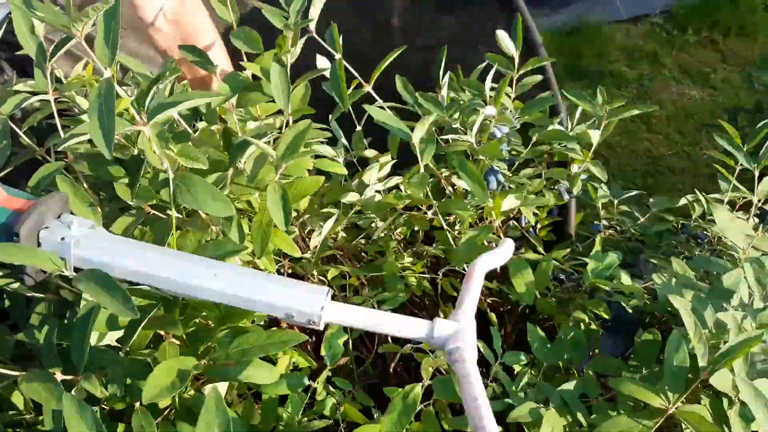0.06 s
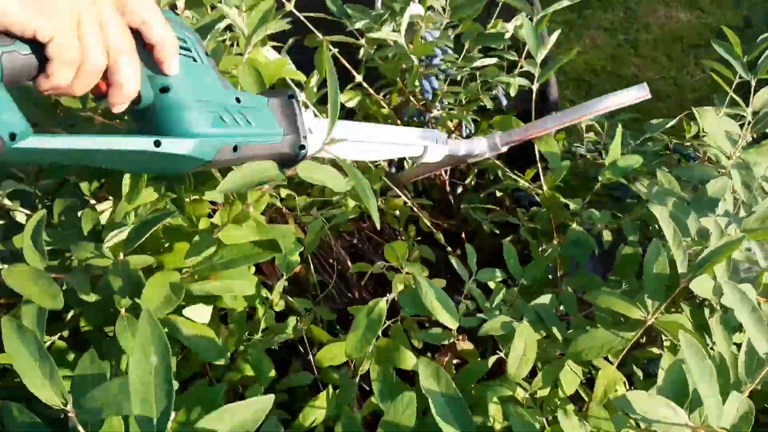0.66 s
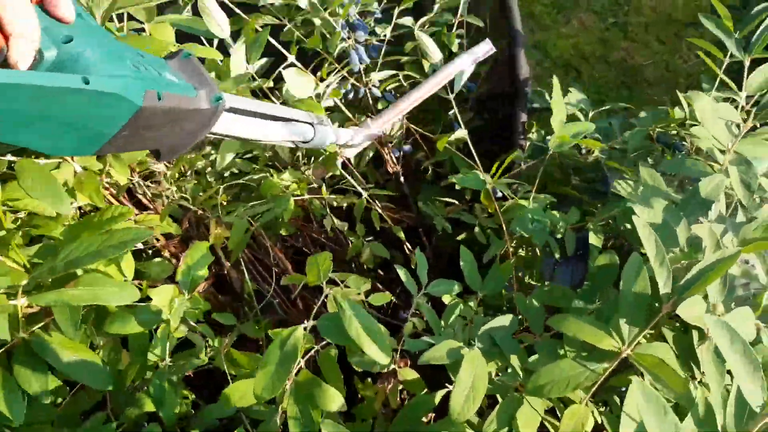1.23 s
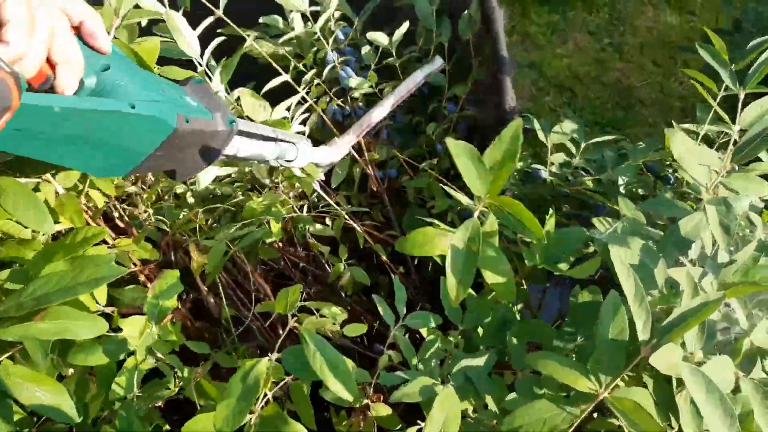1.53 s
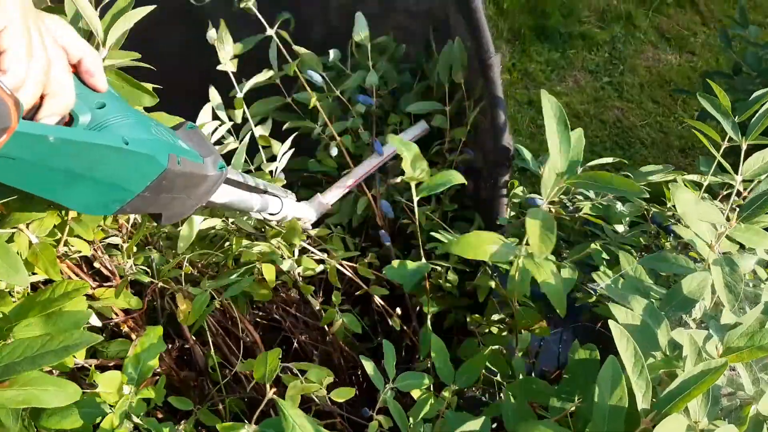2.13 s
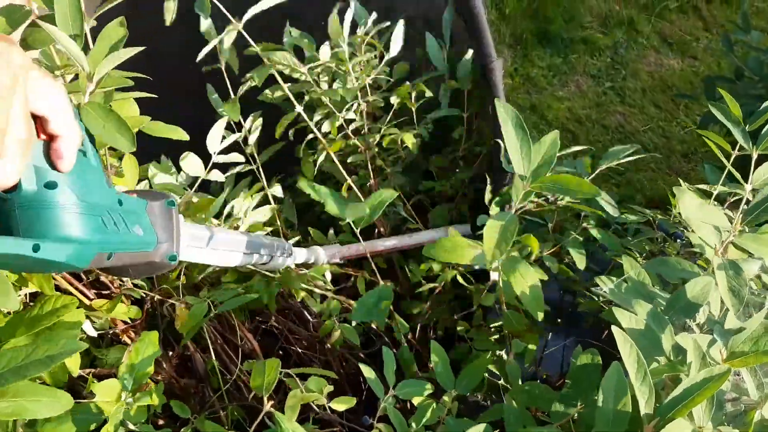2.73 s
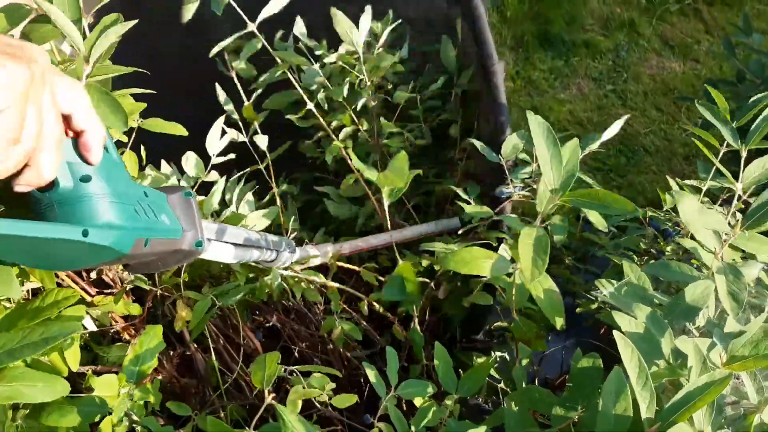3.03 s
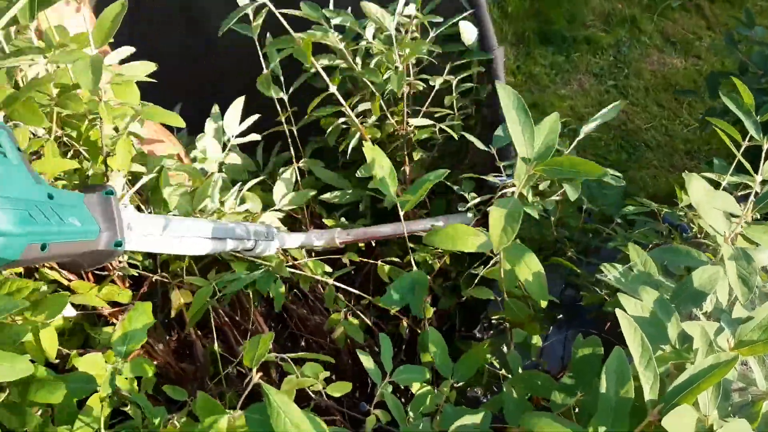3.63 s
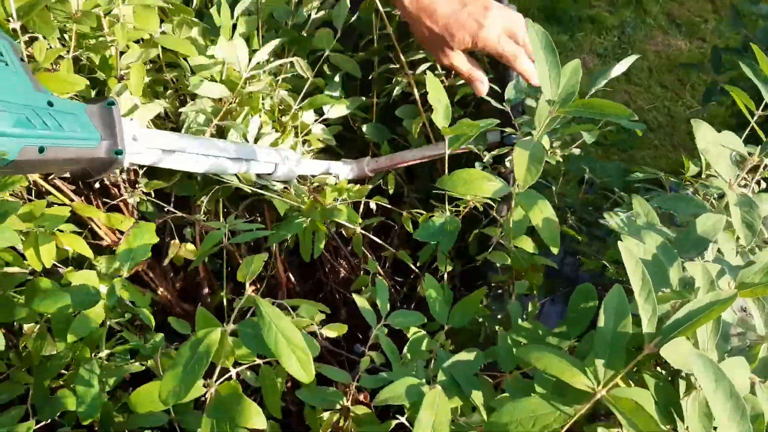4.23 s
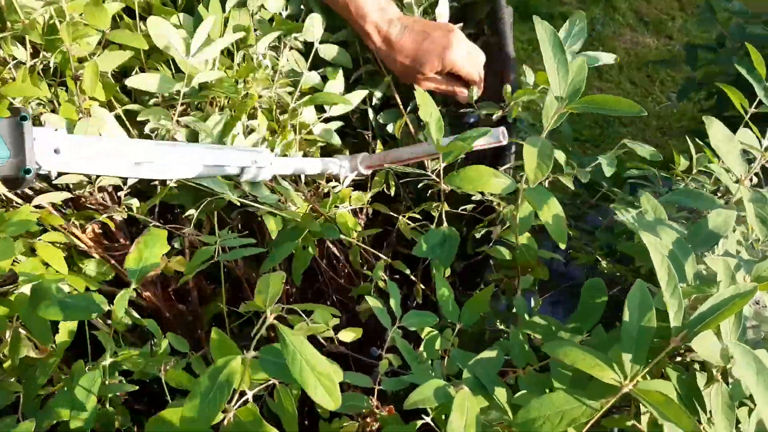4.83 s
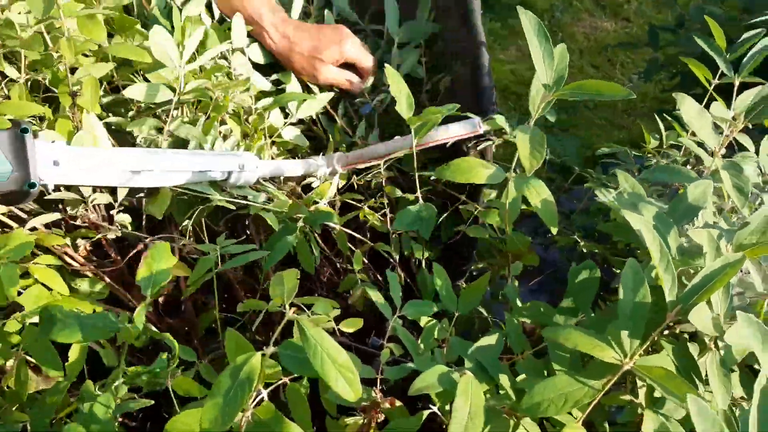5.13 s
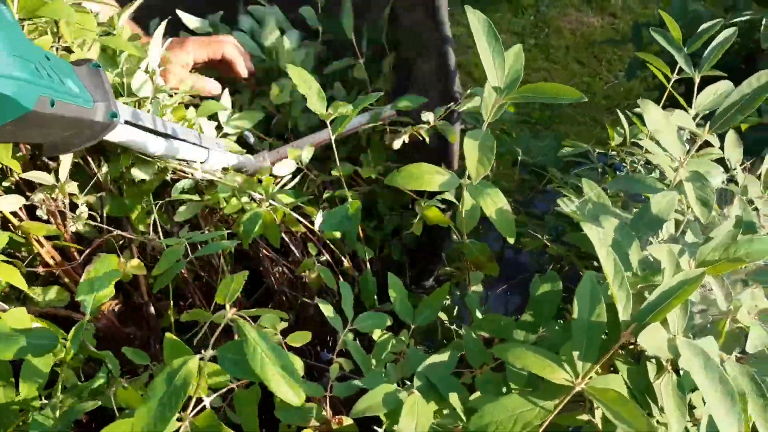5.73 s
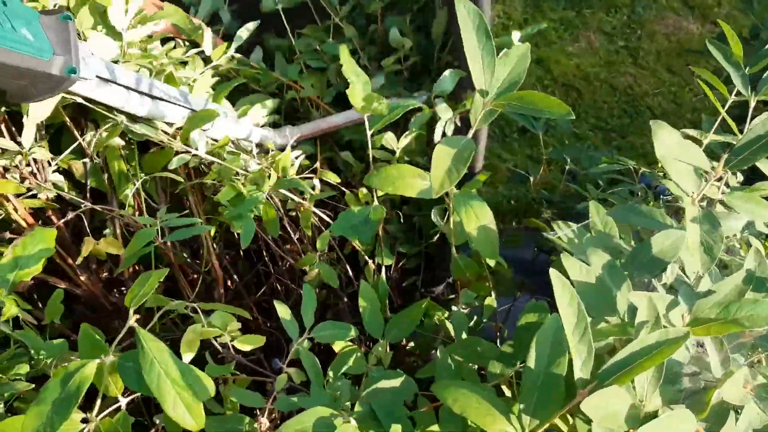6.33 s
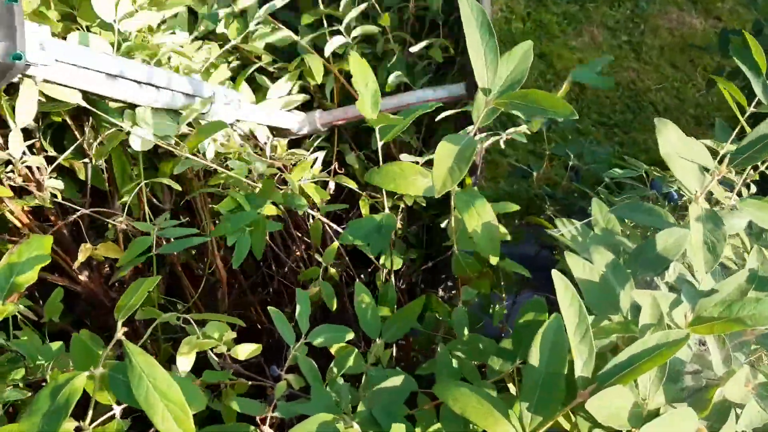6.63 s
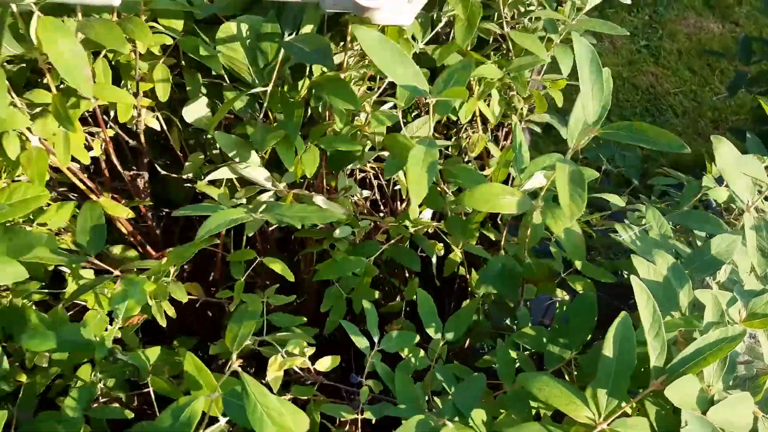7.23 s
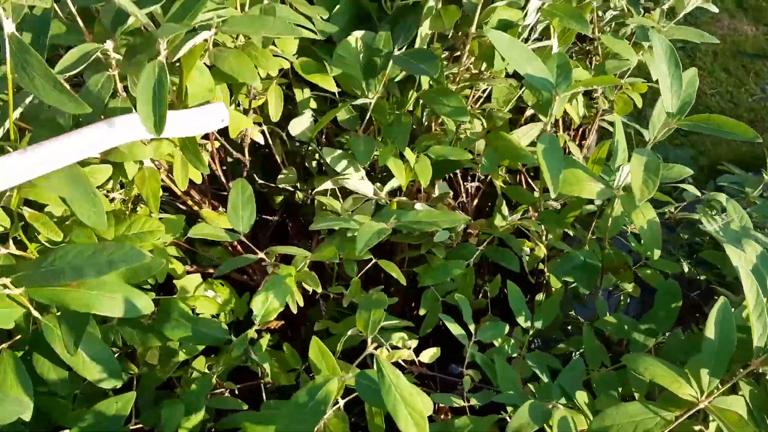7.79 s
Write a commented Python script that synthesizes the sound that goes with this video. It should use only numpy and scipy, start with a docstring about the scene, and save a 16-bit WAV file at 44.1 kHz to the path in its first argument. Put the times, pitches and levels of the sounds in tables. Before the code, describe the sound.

Close to the microphone in a quiet garden, a cordless saw shakes a bush with a rod in two loud bursts of fast mechanical rattling, each spinning up quickly and winding down. The first has a sharp knock partway through; the second is shorter. Before, between and after them, leaves rustle gently, stems bump and twigs tick. A light breeze touches the microphone, with a faint engine and a few chirps far away.

```python
"""A reciprocating saw shaking a berry bush

A cordless saw with a bent rod for a blade runs in two bursts, close to the microphone. Its slide
knocks at both ends of every stroke, rebounds and chatters, exciting the modes of the housing; gears
whine and leaves thrash. Around the bursts leaves rustle, stems bump and twigs tick, while light wind
touches the microphone and, far off, an engine hums and faint chirps sound."""
import sys
import numpy as np
from scipy import signal
from scipy.fft import rfft, irfft
from scipy.io import wavfile
from scipy.ndimage import uniform_filter1d

SR = 44100
rng = np.random.default_rng(int(sys.argv[2]) if len(sys.argv) > 2 else 0)


def dump_mix(stems):
    """Bounce the given channels to the path in sys.argv[1] as a 16-bit WAV at rate SR."""
    frames = np.atleast_2d(stems).T  # one column per channel
    limited = np.clip(frames, -1, 1)  # hard clip at full scale
    pcm = np.round(limited * 32767).astype(np.int16)
    wavfile.write(sys.argv[1], SR, pcm)


N = 346560
T = np.arange(N) / SR

# Crank speed in the two bursts. Each row: time in seconds, strokes per second.
FIRST_SPEED = [(1.884, 22), (1.92, 43.6), (2.02, 42.2), (2.47, 42.2), (2.55, 41.3), (2.78, 42.25),
               (3.3, 42.3), (3.385, 33), (3.46, 20)]
SECOND_SPEED = [(5.597, 13), (5.7, 31.3), (5.745, 39), (5.773, 41), (5.88, 42.05), (6.53, 42.08),
                (6.63, 34), (6.69, 18)]
# A slower crank strikes more softly. Each row: strokes per second, relative force in dB.
FORCE_AT_SPEED = [(15, -45), (22, -32), (26, -20), (30, -15), (34, -5), (42, 0)]
def saw():
    """Forced vibration: one crank times the knocks, the gear whine and the beating of the leaves."""
    speeds = [FIRST_SPEED, SECOND_SPEED]
    bursts = [crank(speed) for speed in speeds]
    turns, running = np.sum(bursts, axis=0)
    stroke_rate = sum(curve(speed) * on for speed, (_, on) in zip(speeds, bursts))
    force_db = np.interp(stroke_rate, *np.transpose(FORCE_AT_SPEED))
    level_db, bright_db, thrash_db, hollow_db = branch_load(force_db)
    slack = 1 + np.clip(0.37 * (-18.5 - level_db), 0, 1.5)  # lightly loaded, the blows lose their timing
    blows = [slide(*burst, slack, chatter_db=-5, chatter_per_s=650) for burst in bursts]
    drive = knocks(np.vstack(blows))
    duty = np.sqrt(np.mean(running))  # refers the rms to the running time
    body = housing(drive) * duty + gear_whine(turns) * running
    treble = butterworth(body, 1, [3000, 6200], "band")
    hollow = butterworth(body, 1, [380, 540], "band")  # the rod bent against a branch
    body = body + (undb(bright_db) - 1) * treble + (undb(hollow_db) - 1) * hollow
    tool = body * undb(level_db) + free_rod(drive) * duty * undb(force_db)
    return radiate(tool) + thrashing(turns) * running * undb(thrash_db)

def crank(speed):
    """Rotation is the integral of speed: returns the turns made and when the motor runs."""
    running = (T >= speed[0][0]) & (T <= speed[-1][0])
    return np.cumsum(curve(speed) * running) / SR * running, running

# Holds on a branch, drifting as it gives. Each row: start in seconds, knock gain in dB, its drift in
# dB/s, treble gain in dB, its drift in dB/s, leaf gain in dB, its drift in dB/s, hollow gain in dB.
BRANCH_HOLDS = [(1.884, -15, -3, -2.5, 4.5, -22, -6, 1.5), (2.778, -15.5, 2.5, -1.5, -1, -27, 2, -1),
                (5.607, -16, -.5, 5, -5.5, -22, -1.5, 3)]
def branch_load(force_db):
    """Mechanical loading: force and branch set the dB gains of knocks, treble, leaves and hollow band."""
    holds = np.array(BRANCH_HOLDS)
    held = np.maximum(np.searchsorted(holds[:, 0], T) - 1, 0)
    start, knock, knock_drift, bright, bright_drift, leaves, leaves_drift, hollow = holds[held].T
    held_s = np.clip(T - start, 0, 1)
    slip_s = np.maximum(T - 2.508, 0) * (held == 0)  # the first branch slides off the rod
    knock_db = knock + knock_drift * held_s + force_db - 32.5 * slip_s
    leaves_db = leaves + leaves_drift * held_s + force_db - 20 * slip_s
    return knock_db, bright + bright_drift * held_s, leaves_db, hollow

# Blows within one crank turn. Each row: fraction of the turn, relative crack in dB, relative dull push
# in dB, timing scatter in milliseconds before slack widens it.
TURN_BLOWS = [(0, -1.5, -2, .1), (.035, -2, -2, .15), (.075, -3.5, -3.5, .25), (.125, -5, -3, .2),
              (.28, -12, -11, .5), (.48, -.5, -6, .15), (.515, -4.5, -8, .25), (.58, -10, -10, .45),
              (.67, -12, -12, .5)]
def slide(turns, running, slack, chatter_db, chatter_per_s, scatter_db=.9):
    """Backlash: the slide strikes at each reversal, rebounds and chatters. Rows: seconds, crack, push."""
    whole_turns, run_times, rows = np.arange(int(np.max(turns)) + 1), T[running], []
    for share, crack_db, push_db, scatter_ms in TURN_BLOWS:
        late, uneven = rng.standard_normal((len(whole_turns), 2)).T
        when = np.interp(whole_turns + share, turns[running], run_times)
        loose = np.interp(when, T, slack)
        size = undb(scatter_db * uneven * loose) * (whole_turns + share < np.max(turns))
        when = when + late * loose * scatter_ms / 1000
        rows.append(np.c_[when, size * undb(crack_db), size * undb(push_db)])
    run_s = np.ptp(run_times)
    when, size = rng.random((int(chatter_per_s * run_s), 2)).T
    rows.append(np.c_[run_times[0] + when * run_s, undb(chatter_db) * (2 * size - 1), 0 * size])
    return np.vstack(rows)

def knocks(blows, points=8):
    """Impact excitation: each blow gives the same dull push and a crack from one of a few contacts."""
    times, crack, push = blows.T
    point = rng.integers(0, points, len(times))
    cracks = 0
    for k in range(points):
        hits = clicks(times[point == k], crack[point == k])
        response = contact(crack_t60=0.006, tail_t60=0.17, tail_db=-12.5)
        cracks = cracks + signal.oaconvolve(hits[None], response, axes=1)[:, :N]
    push_spectrum = [(150, -6.5), (300, -0.5), (600, -1.5), (1300, -1.5), (3000, -11.5), (8000, -23)]
    crack_spectrum = [(150, -11), (500, -6), (1100, -2), (5000, 0.5), (9000, -3), (14000, -4)]
    return colour(unit(clicks(times, push)), push_spectrum) + colour(unit(cracks), crack_spectrum)

def contact(crack_t60, tail_t60, tail_db):
    """Impulse response of one contact: a short dense crack and a tail scattered by the bush."""
    t = T[:SR // 6]
    envelope = fade(t, crack_t60) + undb(tail_db) * fade(t, tail_t60)
    return unit(stereo_noise(split_hz=2500, envelope=envelope))

# Spectrum of a knock in housing and rod. Each row: frequency in Hz, relative level in dB.
KNOCK_SPECTRUM = [(71, -22.5), (120, -11), (192, -16), (288, -8), (353, -11.5), (690, -4.5), (796, -7.5),
                  (955, -7), (1760, -5), (2110, -4.5), (3370, -13), (4130, -7), (5960, -21), (13200, -25.5),
                  (15500, -24)]
# Modes of housing and slide. Each row: frequency in Hz, relative level in dB, 60 dB decay in seconds.
HOUSING_MODES = [(698, -23, 0.041), (935, -24, 0.029), (1340, -20.5, 0.015), (2100, -14, 0.022),
                 (2306, -18.5, 0.022), (4020, -39.5, 0.019), (7740, -28.5, 0.073)]
def housing(drive):
    """Structural resonance: the housing filters the knocks and rings at its natural frequencies."""
    body = unit(colour(drive, KNOCK_SPECTRUM)) + resonate(drive, HOUSING_MODES)
    return unit(butterworth(body, 4, 142, "high"))

# Tones of gears and motor. Each row: multiple of the crank speed, relative level in dB.
GEAR_ORDERS = [(6, -31), (7, -25), (10, -25), (13, -22), (16, -17), (22, -20), (24, -22), (49, -24),
               (98, -27)]
def gear_whine(turns):
    """Rotational harmonics: gears and motor sound at multiples of the slightly wavering crank speed."""
    phase = 2 * np.pi * (turns + 0.0034 * walk(30))
    return sum(undb(db) * np.sqrt(2) * np.sin(order * phase) for order, db in GEAR_ORDERS)

# Modes of the rod's free end. Each row: frequency in Hz, relative level in dB, 60 dB decay in seconds.
ROD_MODES = [(6820, 2, .033), (2108, 1, .08)]
# Moments when the rod is free. Each row: centre in seconds, gain in dB, half-width in seconds.
ROD_SWELLS = [(2.15, -36, 0.087), (2.44, -40, .1), (2.89, -36.5, 0.13), (3.2, -39.5, 0.081),
              (5.98, -35, .17), (6.38, -38, .08), (6.55, -33, 0.12)]
def free_rod(drive):
    """Modal ringing: now and then the knocks set the rod's free end ringing thinly."""
    return resonate(drive, ROD_MODES) * swells(ROD_SWELLS)

# Balance of the tool. Each row: frequency in Hz, left minus right level in dB.
TOOL_BALANCE = [(200, 0), (700, 3), (1300, -3), (2400, -6), (4400, -1.5), (8000, 0.5)]
def radiate(tool, lag_samples=9):
    """Path difference and directivity: sound arrives first on the left; the rod radiates more right."""
    left = colour(tool[0], [(hz, db / 2) for hz, db in TOOL_BALANCE])
    right = colour(np.roll(tool[1], lag_samples), [(hz, -db / 2) for hz, db in TOOL_BALANCE])
    return np.vstack([left, right])

# Spectrum of beaten leaves. Each row: frequency in Hz, relative level in dB.
THRASH_SPECTRUM = [(150, -59), (1500, -5), (4000, -3.5), (7000, -1), (9500, -7), (13000, 2.5),
                   (16000, -7.5)]
def thrashing(turns):
    """Amplitude modulation: the rod whips the leaves twice a turn, so their crackle pulses slightly."""
    beat = 1 + 0.067 * np.cos(4 * np.pi * (turns - .08))
    return crackle(THRASH_SPECTRUM, per_s=2800, spread_db=3, t60=0.021) * beat * pan(db=-2)

# Spectrum of sliding leaves. Each row: frequency in Hz, relative level in dB.
RUSTLE_SPECTRUM = [(530, -25), (900, -9), (1270, -4), (2060, -1.5), (3290, -4), (5630, -2), (6430, -1),
                   (8890, -4.5), (12300, 0.5), (15800, -8.5)]
# Sweeps of rod or hand. Each row: start in seconds, length in seconds, rustle in dB, dry stalks in dB.
LEAF_SWEEPS = [(0.0, .3, -51, -57.5), (0.31, 0.66, -46.5, -51.5), (0.753, 0.084, -40, -56),
               (1.02, 0.26, -54.5, -75), (1.226, 0.47, -49.5, -69), (1.68, 0.17, -56, -70.5),
               (3.45, 0.45, -55, -66), (3.708, 0.29, -50.5, -62), (4.35, 0.29, -61, -69.5),
               (4.61, .2, -51.5, -69), (4.8, .2, -51.5, -61), (4.98, .6, -49, -55.5),
               (5.538, .045, -46, -65), (6.675, 0.48, -48.5, -58.5), (6.879, 0.084, -44.5, -76),
               (7.15, 0.2, -58, -66), (7.644, .22, -55, -56), (7.746, 0.13, -50.5, -53.5)]
def bush(rest_db=-65.5, attack_s=0.022, settle_t60=0.2):
    """Friction noise: swept leaves rub, their edges crackle and stalks crunch; sweeps add in power."""
    leaf_power, stalk_power = undb(rest_db) ** 2, 0
    for start, length, leaves_db, stalks_db in LEAF_SWEEPS:
        rise = np.clip((T - start) / attack_s, 0, 1)
        sweep = rise * fade(np.maximum(T - start - length, 0), settle_t60)
        leaf_power = leaf_power + (sweep * undb(leaves_db)) ** 2
        stalk_power = stalk_power + (sweep * undb(stalks_db)) ** 2
    edge_spectrum = [(200, -40), (3000, -18), (8000, -8), (12500, 0), (16000, -3)]
    stalk_spectrum = [(200, -30), (900, -6), (2000, 0), (5000, -8), (13000, -24)]
    rustle = crackle(RUSTLE_SPECTRUM, per_s=1400, spread_db=1.5, t60=0.047)
    edges = undb(-3) * crackle(edge_spectrum, per_s=130, spread_db=2.55, t60=.016)
    stalks = crackle(stalk_spectrum, per_s=150, spread_db=2, t60=.018)
    return (rustle + edges) * np.sqrt(leaf_power) + stalks * np.sqrt(stalk_power)

def crackle(spectrum, per_s, spread_db, t60):
    """Shot noise: many tiny scratches of unequal size, scattered from left to right, add in energy."""
    when, chance, place = rng.random((int(per_s * N / SR), 3)).T
    size = undb(-spread_db * np.log(np.maximum(chance, .004)))
    energy = [clicks(when * N / SR, size ** 2 * share) for share in (place, 1 - place)]
    envelope = np.sqrt(signal.lfilter([1], [1, -fade(1 / SR, t60) ** 2], energy) + 1e-12)
    return unit(colour(envelope * stereo_noise(split_hz=430), spectrum))

# Dull knocks of stems and handling, with the last clack of the saw's slide as it stops; ticks of twigs.
# Each row: start in seconds, peak in dB, centre frequency in Hz, 60 dB decay in seconds.
DULL_KNOCKS = [(0.871, -26, 1870, 0.061), (0.874, -25, 744, 0.043), (0.958, -27, 450, 0.016),
               (2.778, -9.5, 1184, 0.023), (3.74, -37.5, 700, 0.025), (4.911, -37, 487, 0.022),
               (4.95, -33.5, 299, 0.023), (5.013, -38, 439, 0.025), (5.042, -36, 252, 0.025),
               (5.075, -38, 409, 0.028), (5.086, -32, 460, 0.012), (5.371, -36, 347, 0.031),
               (6.664, -21.5, 2020, 0.069)]
TWIG_TICKS = [(0.321, -27, 4370, 0.02), (0.352, -32, 1850, 0.032), (0.528, -32, 2200, 0.02),
              (0.72, -29, 2060, 0.013), (0.791, -22.5, 7600, 0.044), (1.592, -31, 11000, 0.02),
              (1.679, -31, 9000, 0.03), (3.74, -32.5, 1880, 0.008), (4.097, -41, 10000, 0.02),
              (4.293, -35, 11900, 0.02), (4.691, -30.5, 6910, 0.015), (5.46, -25, 11000, 0.018),
              (7.543, -50.5, 1070, 0.016), (7.598, -41, 10000, 0.02)]
def taps(rows, band_ratio, split_hz):
    """Damped impacts: each brief contact is a decaying noise burst around its own centre frequency."""
    out, t = np.zeros((2, N)), T[:SR // 10]
    for s, db, hz, t60 in rows:
        band = [hz / band_ratio, min(hz * band_ratio, .45 * SR)]
        tap = butterworth(stereo_noise(split_hz, fade(t, t60)), 2, band, "band")
        start = int(s * SR)
        out[:, start:start + len(t)] += (tap * undb(db) / np.max(np.abs(tap)))[:, :N - start]
    return out

# The squeak of the starting motor, and faint chirps far off.
# Each row: start in seconds, length in seconds, frequency in Hz, level in dB.
MOTOR_SQUEAK = [(5.647, 0.057, 3290, -44)]
FAR_CHIRPS = [(.89, .13, 4700, -61), (1.47, 0.12, 4660, -65), (1.74, 0.14, 4720, -65),
              (4.03, .07, 4730, -74), (4.44, .14, 4700, -72), (7.2, 0.13, 4800, -66),
              (7.44, 0.38, 4750, -76)]
def whistles(rows, waver):
    """Frequency modulation: short tones swell and fade while their pitch wavers at random."""
    out, warped_time = np.zeros(N), np.cumsum(1 + waver * walk(250)) / SR
    for s, length, hz, db in rows:
        on = (T > s) & (T < s + length)
        arch = np.sqrt(2 * np.abs(np.sin(np.pi * (T[on] - s) / length)))
        out[on] += undb(db) * arch * np.sin(2 * np.pi * hz * warped_time[on])
    return out

# Spectrum of wind on the microphone. Each row: frequency in Hz, relative level in dB.
WIND_SPECTRUM = [(20, -36), (32, -15.5), (47, -6.5), (70, 2.5), (125, 2), (200, -18), (400, -34.5),
                 (1000, -56)]
# Gusts. Each row: centre in seconds, level in dB, half-width in seconds.
WIND_GUSTS = [(.17, -37, 0.019), (.3, -45.5, 0.16), (.7, -43, 0.095), (.92, -46, 0.077),
              (1.25, -53.5, 0.24), (1.78, -48.5, 0.12), (2.36, -53.5, .08), (2.97, -36, 0.04),
              (2.9, -45.5, 0.41), (3.5, -44, 0.063), (4.0, -55.5, 0.081), (4.16, -45.5, .02),
              (5.022, -46.5, 0.13), (5.23, -51, .05), (5.38, -45, 0.059), (5.59, -41.5, .04),
              (6.94, -42, 0.0077), (7.03, -49.5, 0.1)]
def wind(breeze_db=-57.5):
    """Turbulent pressure: a light breeze buffets the microphone; gusts swell and die away."""
    rumble = unit(colour(stereo_noise(split_hz=45), WIND_SPECTRUM))
    return rumble * (undb(breeze_db) + swells(WIND_GUSTS)) * pan(db=6.5)

# Partials of the far engine. Each row: multiple of the firing rate, relative level in dB.
ENGINE_HARMONICS = [(1, 4), (2, -18.5), (3, -13), (4, -25.5), (5, -24.5), (6, -23.5), (7, -26.5)]
# Course of its hum. Each row: time in seconds, level in dB.
ENGINE_LEVEL = [(0, -44), (.45, -39.5), (.92, -43), (1.04, -52.5), (1.5, -51), (1.77, -41.5), (2.1, -47),
                (2.75, -49), (3.2, -58), (3.4, -45), (3.6, -51), (4.3, -53), (5.0, -47), (5.65, -46.5),
                (6.35, -56), (6.9, -51.5), (7.23, -56), (7.4, -51)]
def distant_engine(firing_hz=96.7, waver_db=2):
    """Periodic firing gives a harmonic series, here wavering in pitch and level."""
    phase = 2 * np.pi * np.cumsum(firing_hz * (1 + 0.00785 * walk(3))) / SR
    hum = sum(undb(db + 1.5 * walk(7.7)) * np.sin(round(k) * phase) for k, db in ENGINE_HARMONICS)
    return unit(hum) * undb(curve(ENGINE_LEVEL) + waver_db * walk(8)) * pan(db=2)

# Spectrum of the far background. Each row: frequency in Hz, relative level in dB.
AMBIENT_SPECTRUM = [(30, -32), (100, 1.5), (280, 0.5), (420, -4), (700, 0.5), (1050, -6.5), (2200, -11.5),
                    (5000, -13.5), (15000, -32)]
# Course of that background. Each row: time in seconds, level in dB.
AMBIENT_LEVEL = [(0, -50), (.9, -49), (1.3, -49), (1.8, -51.5), (3.6, -56), (4.3, -61.5), (4.75, -57),
                 (5.08, -51.5), (6.75, -54), (7.2, -58.5), (7.6, -61.5), (7.86, -54)]
def neighbourhood():
    """Ambient noise: the far surroundings give a broad band that slowly rises and falls."""
    air = unit(colour(stereo_noise(split_hz=700), AMBIENT_SPECTRUM))
    return air * undb(curve(AMBIENT_LEVEL) + 0.65 * walk(7.2))

def resonate(drive, modes):
    """Modal superposition: each mode is a damped two-pole resonator."""
    out = 0
    for hz, db, t60 in modes:
        pole = fade(1 / SR, t60)
        feedback = [1, -2 * pole * np.cos(2 * np.pi * hz / SR), pole ** 2]
        out = out + undb(db) * unit(signal.lfilter([1, 0, -1], feedback, drive + 1e-12))
    return out

def colour(x, points, size=4096):
    """Minimum-phase filter through (Hz, dB) points, built from the cepstrum."""
    hz, db = np.transpose(points)
    gain = undb(np.interp(np.log(np.fft.rfftfreq(size, 1 / SR) + 1), np.log(hz), db))
    cepstrum = irfft(np.log(gain))
    cepstrum[1:size // 2] *= 2
    cepstrum[size // 2 + 1:] = 0
    response = irfft(np.exp(rfft(cepstrum)))
    return signal.fftconvolve(np.atleast_2d(x), response[None], axes=1)[:, :x.shape[-1]]

def butterworth(x, order, hz, kind):
    """Filter with a maximally flat passband."""
    return signal.sosfilt(signal.butter(order, hz, kind, fs=SR, output="sos"), x)

def stereo_noise(split_hz, envelope=np.ones(N)):
    """Partial coherence: both channels share the noise below split_hz and differ above it."""
    n = len(envelope)
    ratio = np.fft.rfftfreq(n, 1 / SR) / split_hz
    spectra = rfft(rng.standard_normal((3, n)) * envelope)
    return irfft((spectra[0] + np.sqrt(ratio) * spectra[1:]) / np.sqrt(1 + ratio), n)

def walk(per_s):
    """Smooth random fluctuation of rms 1."""
    hold = int(SR / per_s)
    steps = np.repeat(rng.standard_normal(N // hold + 1), hold)
    return unit(uniform_filter1d(uniform_filter1d(steps, hold), hold)[:N])

def swells(rows):
    """Gain as a sum of Gaussian rises and falls."""
    return sum(undb(db) * np.exp(-((T - s) / half_width) ** 2) for s, db, half_width in rows)

def clicks(times, sizes):
    """A train of single impulses."""
    return np.bincount(np.clip(times * SR, 0, N - 1).astype(int), sizes, N)

def fade(t, t60):
    """Exponential decay, 60 dB down after t60."""
    return np.exp(-np.log(1000) * t / t60)

def curve(rows):
    """Linear interpolation of (seconds, value) rows at every sample."""
    return np.interp(T, *np.transpose(rows))

def pan(db):
    """Channel gains for a left minus right level."""
    return undb(np.array([[db], [-db]]) / 2)

def undb(db):
    """Decibels to gain."""
    return 10 ** (np.asarray(db) / 20)

def unit(x):
    """Scale to rms 1."""
    return x / np.sqrt(np.mean(x ** 2))

def scene():
    """Superposition: the saw, the bush and the quiet garden add at the microphone."""
    bumps = taps(DULL_KNOCKS, band_ratio=1.63, split_hz=340)
    ticks = taps(TWIG_TICKS, band_ratio=2.2, split_hz=2000)
    tones = whistles(FAR_CHIRPS, waver=.012) + whistles(MOTOR_SQUEAK, waver=.025)
    return saw() + bush() + bumps + ticks + tones + wind() + distant_engine() + neighbourhood()

def record(dry, ceiling=.9, top_hz=15950):
    """Soft saturation rounds the highest peaks; a steep low-pass limits the bandwidth."""
    rounded = dry / (1 + (dry / ceiling) ** 6) ** (1 / 6)
    return signal.sosfilt(signal.ellip(10, .2, 75, top_hz, fs=SR, output="sos"), rounded)

dry = scene()
out = record(dry)
dump_mix(out)
```